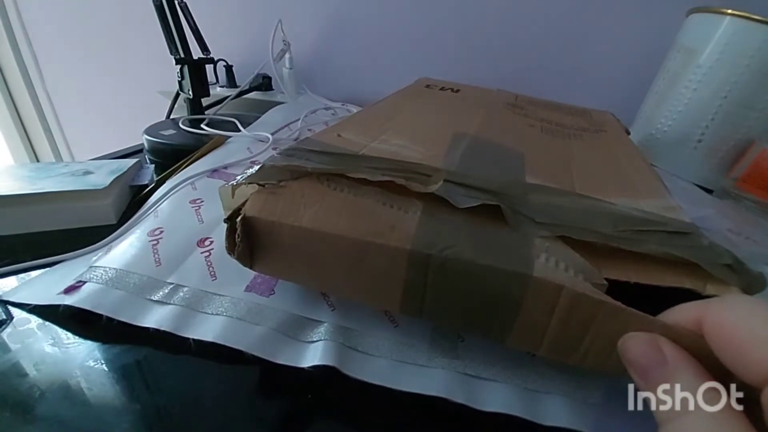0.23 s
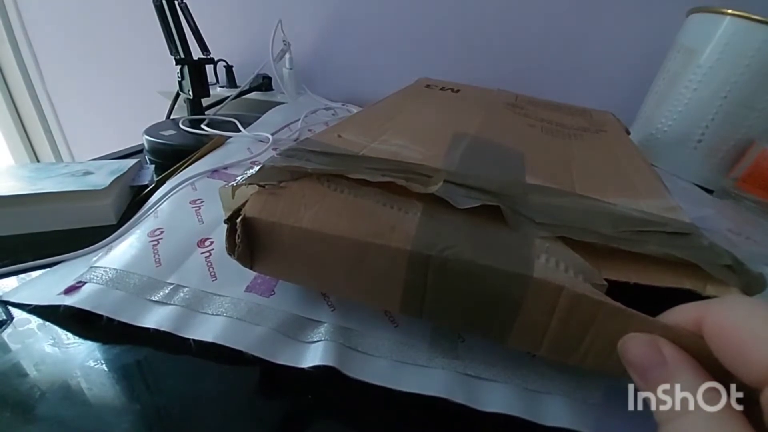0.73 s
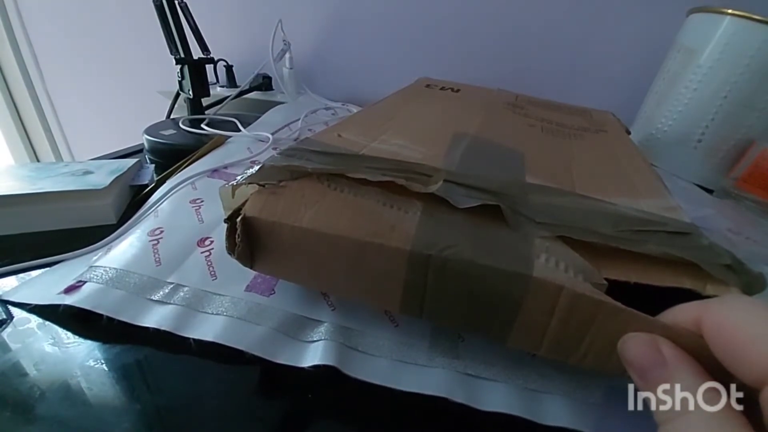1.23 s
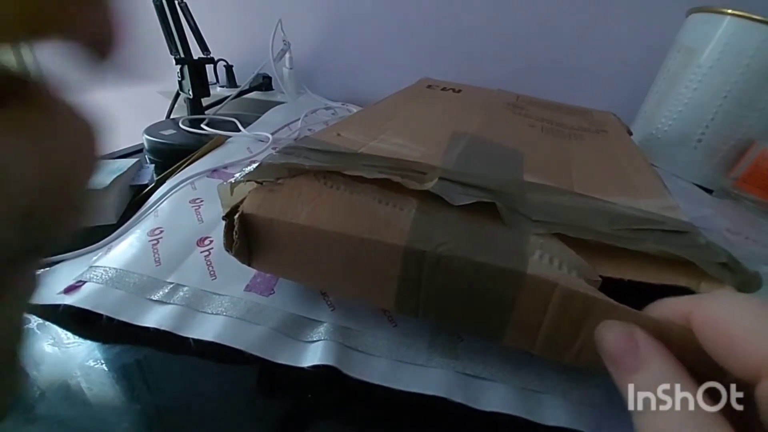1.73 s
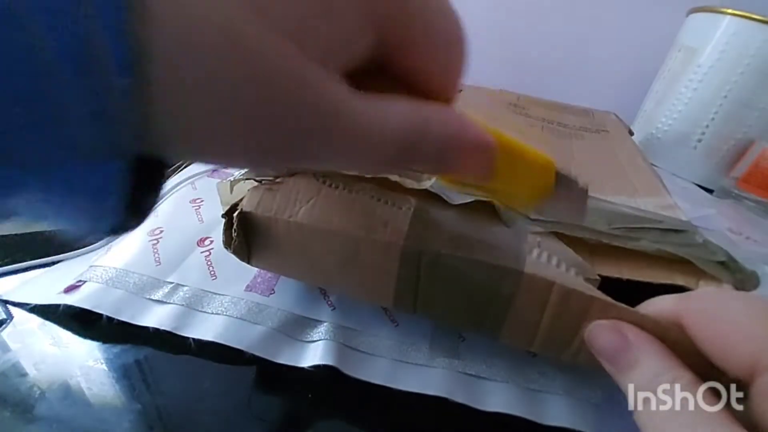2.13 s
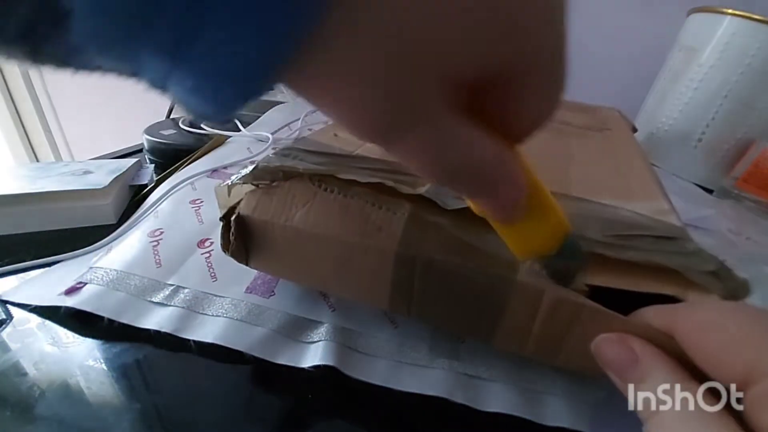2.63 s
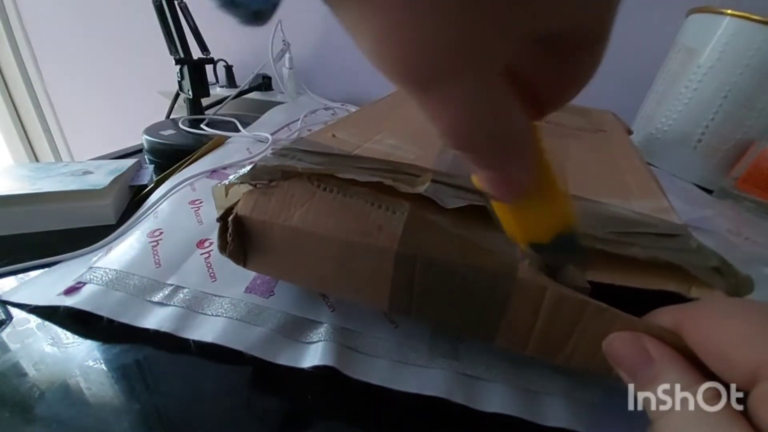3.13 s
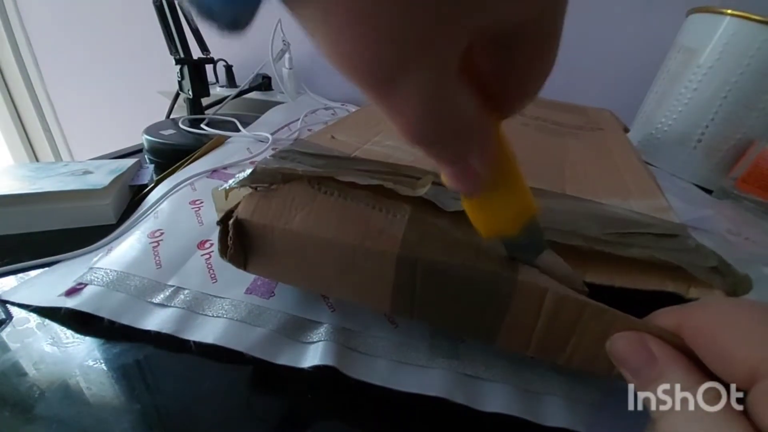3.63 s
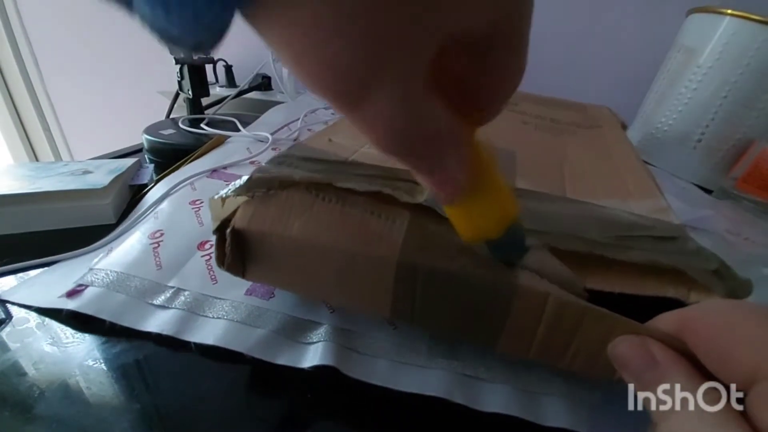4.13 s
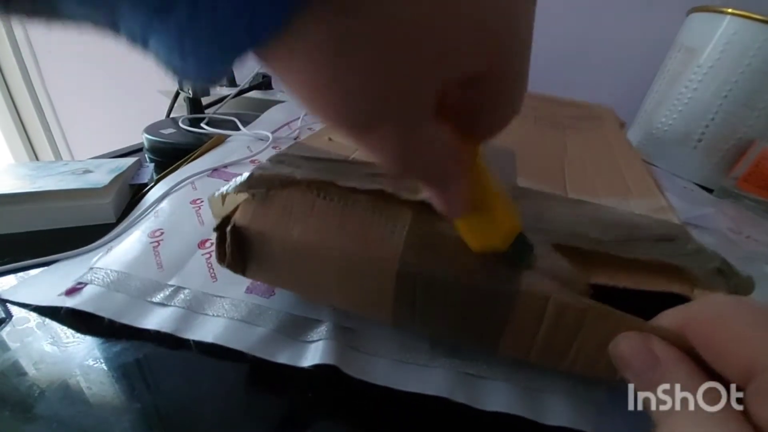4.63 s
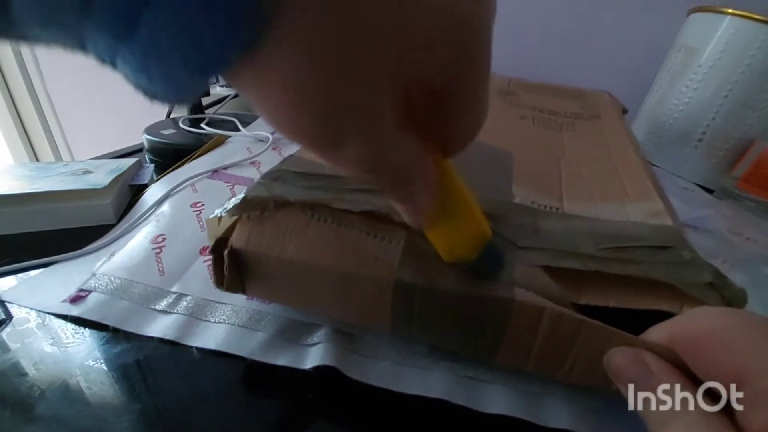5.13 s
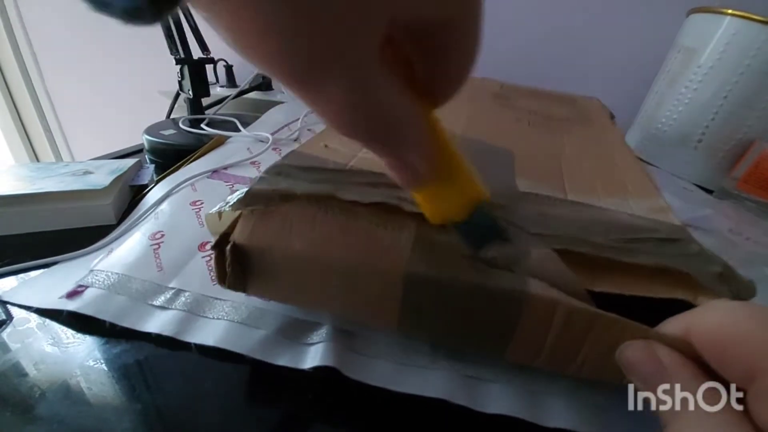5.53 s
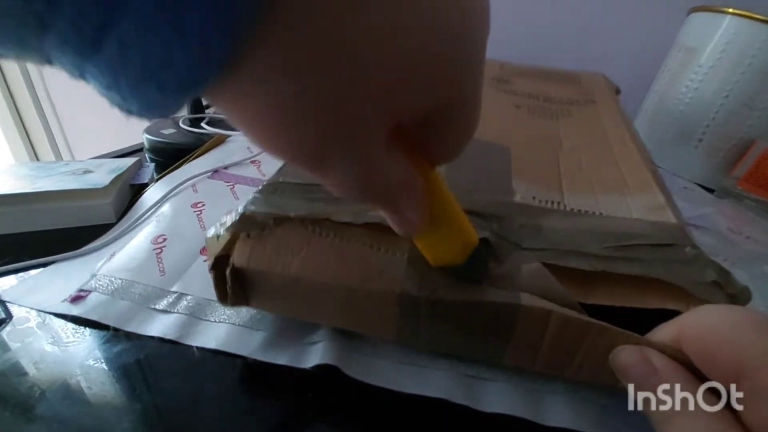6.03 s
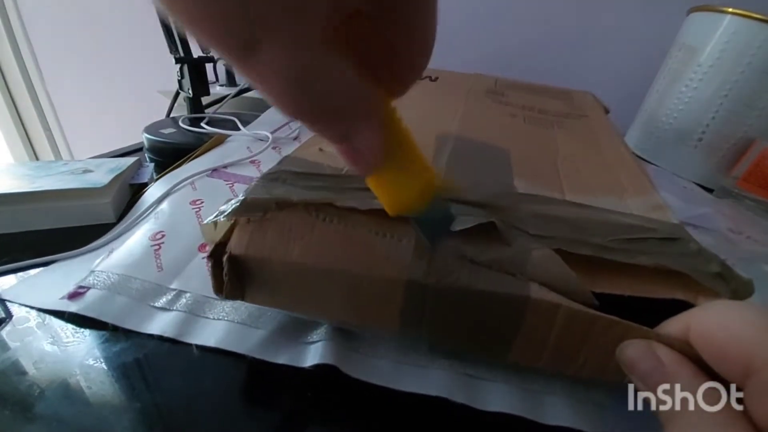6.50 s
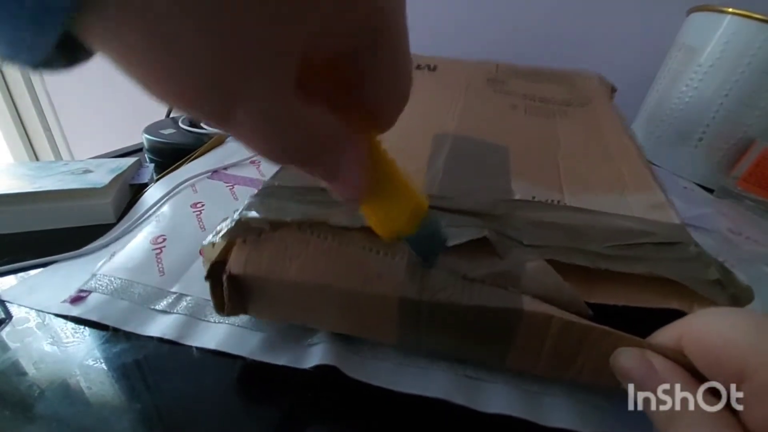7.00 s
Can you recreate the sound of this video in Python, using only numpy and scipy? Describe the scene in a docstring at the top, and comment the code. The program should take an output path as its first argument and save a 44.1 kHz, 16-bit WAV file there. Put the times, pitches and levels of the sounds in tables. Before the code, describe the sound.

A box cutter's slider clicks and rattles lightly on the left, and a sleeve brushes past. The blade then scrapes at a taped cardboard parcel, breaks through with a loud crack and a hollow thump, and saws on in short, irregular strokes. Tape snaps and ticks while the cardboard rasps and tears. It is all heard from close by in a small, quiet room.

```python
"""Box cutter opening a parcel

A box cutter's slider clicks out on the left, a sleeve swings in, and the blade saws through a taped
parcel on a desk. Fibres fracture in short strokes and force the cut flap and the hollow box into
vibration; tape snaps where the blade catches. A phone stands close by in a small, quiet room."""
import sys
import numpy as np
from scipy import signal
from scipy.fft import rfft, irfft
from scipy.io import wavfile
from scipy.ndimage import uniform_filter1d

SR = 44100
rng = np.random.default_rng(int(sys.argv[2]) if len(sys.argv) > 2 else 0)


def transcribe(signal):
    """Save signal, clipped to [-1, 1], as a 16-bit WAV file at the path in sys.argv[1]."""
    frames = np.atleast_2d(signal).T
    limited = np.clip(frames, -1, 1)
    pcm = np.round(limited * 32767).astype(np.int16)
    wavfile.write(sys.argv[1], SR, pcm)


N = 320166
T = np.arange(N) / SR
CONTACT_S, PIERCE_S = 2.33, 3.2  # the blade touches the parcel, then breaks through


def cutting():
    """Forced vibration: one train of fibre breaks and edge friction drives the cut, flap and box."""
    fibre_gain, flap_gain, box_gain, grit = pushes()
    breaks = crackle(rate=1600, scatter_db=8.5, even_s=0.035)
    drive = np.sqrt(grit) * breaks + np.sqrt(1 - grit) * rng.standard_normal(N)
    cut, cracks = fracture(drive * fibre_gain, grit)
    rasp = flap_rasp(drive * flap_gain)
    boom = box_boom(drive * box_gain)
    # long waves reach both microphones alike, short ones are scattered by the creased tape
    return (spread(cut, near_db=3, near_ms=1.0, room_db=-19, pan_db=1.8)
            + spread(cracks, near_db=6.5, near_ms=1.0, room_db=-18.5, pan_db=2.3)
            + spread(rasp, near_db=1.5, near_ms=2.8, room_db=-16, pan_db=3.0)
            + spread(boom, near_db=-2.5, near_ms=3.5, room_db=-11.5, pan_db=1.5))


# Pushes of the blade. Each row: peak time in seconds, rise and fall in ms, levels of fibres, flap and
# box in dB, grit from 0 (gliding in tape) to about 1 (tearing through board).
BLADE_STROKES = [(2.384, 42, 31, -36, -31, -37.5, 0.55), (2.492, 39, 132, -48, -40, -34, 0.55),
                 (2.661, 104, 150, -40, -41, -35.5, 0.5), (2.843, 57, 35, -47.5, -49, -41.5, 0.6),
                 (2.973, 56, 190, -42.5, -46, -48, .25), (3.146, 34, 65, -41, -39, -30, 0.71),
                 (3.226, 21.4, 68, -18, -23.5, -18.5, 0.87), (3.502, 130, 100, -45.5, -42, -43.5, 0.32),
                 (3.685, 31.3, 19, -24, -28.5, -30, 0.62), (3.746, 75, 51, -40, -40, -38, .8),
                 (3.967, 49.5, 71, -33.5, -28.5, -36.5, 0.83), (4.201, 104, 124, -42.5, -43, -43.5, .78),
                 (4.475, 19, 36, -57, -66, -48, 0.71), (4.605, 29, 35, -43, -58, -65, 0.59),
                 (4.699, 95, 108, -39.5, -37.5, -45, 0.32), (4.864, 112, 120, -41.5, -41.5, -57, 0.91),
                 (4.99, 99, 95, -42, -50, -49, 0.86), (5.085, 75, 36, -30.5, -30.5, -35, 0.7),
                 (5.159, 160, 95, -35.5, -37, -38, 0.69), (5.39, 20, 97, -43.5, -47, -54.5, 1),
                 (5.458, 82, 380, -43.5, -38.5, -47, 0.86), (5.565, 67, 55, -59, -57, -43, 1.1),
                 (5.712, 48, 33, -37.5, -44, -49, 1.08), (5.8, 58, 39, -41, -38, -42, 0.3),
                 (5.877, 47, 42, -25.5, -27.5, -26, 0.66), (5.933, 34, 48, -31.5, -36, -35.5, 0.95),
                 (6.133, 90, 120, -44.5, -42.5, -44.5, 0.41), (6.422, 81, 62, -44, -40.5, -38.5, 1.07),
                 (6.533, 40, 31, -52, -44.5, -37.5, 0.49), (6.761, 94, 70, -53, -56, -65, 0.92),
                 (6.961, 110, 89, -47.5, -55.5, -66, 0.83), (7.039, 59, 60, -43, -46, -60, 0.68),
                 (7.1, 58, 79, -49, -53, -48, 0.69), (7.161, 30, 120, -36.5, -41, -40, 0.38),
                 (7.25, 72, 94, -31, -36, -38, 0.77)]


def pushes():
    """Incoherent sources add in power: gains of fibres, flap and box, and the power-weighted grit."""
    fibre, flap, box, grit = np.zeros((4, N))
    for s, rise, fall, fibre_db, flap_db, box_db, rough in BLADE_STROKES:
        force = swell(s, rise, fall)
        power = (undb(fibre_db) * force) ** 2
        fibre += power
        grit += rough * power
        flap += (undb(flap_db) * force) ** 2
        box += (undb(box_db) * swell(s, rise, fall * 0.94)) ** 2  # the box fades a little sooner
    return np.sqrt(fibre), np.sqrt(flap), np.sqrt(box), np.clip(grit / (fibre + 1e-30), 0, 1)


# Spectrum of a breaking fibre. Each row: frequency in Hz, level in dB.
FIBRE_SPECTRUM = [(700, -14.5), (2000, -4), (3000, -2), (3900, 0.5), (4900, 1), (5600, -1.5), (6300, -1),
                  (7200, 1.5), (8500, -1.5), (10500, 1), (12500, 1.5), (14000, 1), (16000, -6.5)]
# Resonance of the steel blade. Each row: frequency in Hz, bandwidth in Hz, level in dB.
BLADE_MODES = [(7900, 750, 0)]


def fracture(drive, grit):
    """Fracture radiates broadband noise, while friction in tape excites the blade's resonance."""
    fibre = colour(FIBRE_SPECTRUM)
    edge = facets(drive)
    tearing = through(surface_scrape(edge, 8700, "low"), fibre)
    singing = undb(-14) * through(edge * (1 - grit), ring(BLADE_MODES))
    cracks = snaps(fibre) + tape_ticks(fibre)
    return tearing + singing, cracks


# Resonances of the cut flap. Each row: frequency in Hz, bandwidth in Hz, level in dB.
FLAP_MODES = [(590, 180, -9.5), (759, 100, -3), (924, 300, 0), (1085, 126, -2), (1210, 220, -2),
              (1580, 280, -4), (1727, 217, -1.5), (2206, 4200, -3.5)]


def flap_rasp(drive, limp_span_s=(4.95, 6.44), limp_hz=910):
    """Plate vibration: the flap rasps at its modes and turns duller as the longer cut leaves it limp."""
    flap = ring(FLAP_MODES)
    stiff = through(drive, flap) + snaps(flap, thump=True)
    dull = signal.sosfilt(signal.butter(1, limp_hz, fs=SR, output="sos"), stiff)
    freed = np.interp(T, limp_span_s, [0, 1])
    return (1 - freed) * stiff + freed * undb(4.5) * dull


# Resonances of the hollow box. Each row: frequency in Hz, bandwidth in Hz, level in dB.
BOX_MODES = [(67.5, 28, -13), (118, 38, -8), (243, 39.4, 0), (298.3, 55.5, 2.5), (347.3, 40, -2),
             (421.7, 39, -3.5), (517, 160, -12)]


def box_boom(drive):
    """Resonance of a hollow body: the box booms at its low modes under the cut and the snaps."""
    box = ring(BOX_MODES)
    return through(surface_scrape(drive, 230, "high"), box) + undb(-5) * snaps(box, thump=True)


# Tape and board giving way. Each row: start in seconds, decay in ms, crack in dB, thump in dB.
TAPE_SNAPS = [(2.111, 1.15, -44, -32.5), (2.352, 0.6, -31, -39), (2.565, .19, -36, -69),
              (3.216, 3.9, -16, -14), (3.233, 3.3, -22, -17), (3.422, 0.33, -38.5, -45.5),
              (3.456, 0.28, -37.5, -40.5), (3.656, 0.22, -35, -42.5), (3.744, 2.5, -53, -27.5),
              (3.886, 0.49, -44, -52), (3.911, .44, -41.5, -42), (4.087, 2.6, -38, -48),
              (4.146, 2.3, -43, -37), (4.193, 0.92, -38, -58), (4.302, 0.16, -39, -46),
              (4.581, .27, -41.5, -72), (4.631, 1.3, -34.5, -51), (4.857, 3, -34, -31),
              (4.922, 2.8, -30.5, -52), (5.087, 3, -27, -25.5), (5.271, .3, -52, -85),
              (5.309, 0.37, -45, -65), (5.371, 0.18, -41.5, -60), (5.411, .23, -40, -49),
              (5.443, 2.6, -32.5, -32), (5.52, 0.15, -28.5, -32.5), (5.55, 2.2, -24.5, -22.5),
              (5.587, 1.5, -34, -59), (5.768, 0.082, -33, -46), (5.933, 0.21, -25.5, -47),
              (6.108, 0.6, -33.5, -39), (6.189, 2.9, -38, -45), (6.346, 0.31, -39.5, -41.5),
              (6.396, 3.8, -36, -31), (6.471, 0.68, -39, -36.5), (6.516, 3.8, -35.5, -35),
              (6.584, 0.33, -51, -58), (7.032, 0.37, -41, -51)]


def snaps(response, thump=False):
    """Sudden release of strain excites a response, as a crack at the cut or a thump in a body."""
    s, ms, crack_db, thump_db = np.transpose(TAPE_SNAPS)
    return blows(s, ms, thump_db if thump else crack_db, response)


def tape_ticks(response, count=256, per_s=57, decay_ms=0.26):
    """A Poisson process: the strained tape ticks at random while the blade rests in it."""
    s = CONTACT_S + np.cumsum(rng.exponential(1 / per_s, count))
    db = -64 + 2.5 * rng.standard_normal(count)
    return blows(np.minimum(s, N / SR), np.full(count, decay_ms), db, response)


def facets(x, shared=0.51):
    """Directivity: each break faces its own way, so the microphones share only part of its power."""
    return x * (np.sqrt(shared) + np.sqrt(1 - shared) * rng.choice([-1, 1], (2, N)))


def surface_scrape(x, hz, kind):
    """Shallow contact hardly excites one end of the spectrum until the blade breaks through."""
    weak = signal.sosfilt(signal.butter(1, hz, kind, fs=SR, output="sos"), x)
    return np.where(T < PIERCE_S, weak, x)


# The detent lifts out of a notch and drops into the next. Each row: drop time in seconds, lead of
# the lift in ms, lift relative to the drop in dB, shell level in dB, blade level in dB.
DETENT_NOTCHES = [(0.067, 12, -15.5, -27, -18.5), (0.126, 12.3, 4.5, -33, -27),
                  (0.321, 11, -14.5, -32, -20), (0.504, 11.8, -2, -37.5, -36.5), (0.996, 6, -7.5, -37, -32),
                  (1.017, 14, -9.5, -26, -28), (1.663, 14, -6.5, -26, -27.5), (1.682, 6.4, -20, -18.5, -40)]
# The loose slider ticks in the handle. Each row: start in seconds, shell level in dB, blade level in dB.
SLIDER_TICKS = [(0.006, -49.5, -35), (0.451, -46, -53), (0.793, -50, -54), (0.821, -46, -58),
                (0.892, -42, -48.5), (1.153, -45.5, -45), (1.245, -50.5, -52.5), (1.291, -46, -61),
                (1.444, -44.5, -58.5), (1.596, -38, -49), (1.736, -37, -67), (1.797, -35.5, -50),
                (2.228, -56, -47)]
# Resonances of the plastic shell. Each row: frequency in Hz, bandwidth in Hz, level in dB.
SHELL_MODES = [(1712, 600, -9), (1988, 260, -1), (2278, 170, -0.5), (2463, 305, -1.5), (3380, 480, -11.5),
               (4110, 490, -12), (5780, 810, -12)]
# Spectrum of the chattering steel blade. Each row: frequency in Hz, level in dB.
BLADE_SPECTRUM = [(60, -15), (250, -18), (900, -21), (2500, -6.5), (4700, -5), (6000, -2), (7800, -7),
                  (9800, -0.5), (12000, -3.5), (16000, -4)]


def slider(creep_count=7):
    """Impact excitation: the detent jumps its notches, so the shell knocks and the blade chatters."""
    drops = [(s, shell, blade) for s, _, _, shell, blade in DETENT_NOTCHES]
    lifts = [(s - ms / 1000, shell + db, blade + db) for s, ms, db, shell, blade in DETENT_NOTCHES]
    creep = [(s, -54, -64) for s in rng.uniform(0.55, 0.75, creep_count)]  # ticks between two notches
    jumps, ticks = drops + lifts, SLIDER_TICKS + creep
    s, shell_db, blade_db = np.transpose(jumps + ticks)
    knock_ms, chatter_ms = np.full(len(s), 1.5), [3.2] * len(jumps) + [3.7] * len(ticks)
    shell = blows(s, knock_ms, shell_db, ring(SHELL_MODES))
    # a faint, smooth high hiss swells and fades behind the clicks
    hiss = undb(-62) * swell(1.58, rise_ms=704, fall_ms=554.5) * rng.standard_normal(N)
    bright = colour(BLADE_SPECTRUM)
    treble = blows(s, chatter_ms, blade_db, bright) + through(hiss, bright)
    left, right = (spread(shell, near_db=0, near_ms=4.5, room_db=-12, pan_db=10)
                   + spread(treble, near_db=8, near_ms=2.3, room_db=-9, pan_db=7.5))
    return np.array([left, np.pad(right, (22, 0))[:N]])  # the far side hears it 0.5 ms later


# Sweeps of the arm. Each row: peak time in seconds, rise in ms, fall in ms, level in dB.
SLEEVE_SWEEPS = [(1.451, 220, 350, -70.5), (1.85, 196, 123, -43.5), (2.058, 96, 230, -53.5)]
# Spectrum of rubbing cloth. Each row: frequency in Hz, level in dB.
CLOTH_SPECTRUM = [(60, -22.5), (500, -12.5), (950, 2.5), (1400, -1.5), (3000, -9), (5500, -12), (8000, -14),
                  (16000, -16.5)]


def sleeve():
    """Friction noise: cloth brushes along, louder the faster the arm comes round."""
    speed = sum(undb(db) * swell(s, rise, fall) for s, rise, fall, db in SLEEVE_SWEEPS)
    rub = through(crackle(rate=5000, scatter_db=10.5, even_s=0.044) * speed, colour(CLOTH_SPECTRUM))
    return spread(rub, near_db=2.5, near_ms=10, room_db=-15, pan_db=3)


# Low thumps of handling. Each row: start in seconds, decay in ms, level in dB.
HANDLING_THUMPS = [(0.07, 60, -52), (0.321, 19, -47.5), (3.224, 35, -34), (5.869, 27, -37),
                   (6.53, 25, -47.5), (7.121, 50, -33), (7.199, 29, -36)]


def handling():
    """Damped resonance: handling thumps at two low modes under the first slider clicks and hard cuts."""
    s, ms, level_db = np.transpose(HANDLING_THUMPS)
    boom = blows(s, ms, level_db, ring([(55, 18, -3.5), (92, 52, -3.0)]))
    return spread(boom, near_db=-16, near_ms=5, room_db=-19, pan_db=7)


# Spectrum of the quiet room. Each row: frequency in Hz, level in dB.
ROOM_SPECTRUM = [(25, -2), (60, 8), (160, -4), (280, 1), (500, -12), (1000, -23.5), (4000, -11.5),
                 (16000, -20.5)]


def hush():
    """Stationary noise: the low murmur of the room with a faint hiss above it."""
    air = through(rng.standard_normal(N), colour(ROOM_SPECTRUM, size=4096))
    return undb(-70.5) * spread(air, near_db=-2.5, near_ms=4, room_db=-4.5, pan_db=0)


def spread(x, near_db, near_ms, room_db, pan_db, size=4096, tail_size=16384, t60_s=0.22):
    """Superposition of direct sound, near scatter that changes as the hands move, and reverberation."""
    hop = size // 2
    window = np.sin(np.pi * np.arange(size) / size)
    stereo = np.pad(np.broadcast_to(x, (2, N)), ((0, 0), (hop, size)))
    frames = np.lib.stride_tricks.sliding_window_view(stereo, size, axis=-1)[:, ::hop] * window
    t = T[:size // 4]
    # each frame at each microphone has its own near reflections
    near = unit(rng.standard_normal((2, frames.shape[1], len(t))) * np.exp(-1000 * t / near_ms))
    pieces = signal.fftconvolve(frames, near, axes=-1)
    scatter = np.zeros((2, N + 3 * size))
    for k in range(frames.shape[1]):
        scatter[:, k * hop:k * hop + pieces.shape[-1]] += pieces[:, k]
    t = T[:tail_size]
    build_up = np.minimum(t / 0.0095, 1) ** 2
    walls = unit(rng.standard_normal((2, tail_size)) * undb(-60 * t / t60_s) * build_up)
    close = (x + undb(near_db) * scatter[:, hop:hop + N]) / np.hypot(1, undb(near_db))
    balance = undb(np.array([[pan_db], [-pan_db]]) / 2)
    return (close + undb(room_db) * through(x, walls)) * balance


def blows(times, decays_ms, levels_db, response, size=4096):
    """Transient excitation: bursts of tiny slips strike a body; a level is their energy as a 10 ms rms."""
    out, t = np.zeros(N + size), T[:size]
    slips = rng.standard_normal((len(times), size))
    for s, ms, db, slip in zip(times, decays_ms, levels_db, slips):
        burst = slip * np.exp(-1000 * t / max(ms, .1))
        start = max(int(s * SR), 0)
        out[start:start + size] += undb(db) * np.sqrt(SR / 100) * unit(through(burst, response)[0])
    return out[:N]


def crackle(rate, scatter_db, even_s):
    """Shot noise: `rate` random impulses a second, of log-normal force, levelled to a steady power."""
    hits = rng.random(N) < rate / SR
    impulses = hits * undb(scatter_db * rng.standard_normal(N)) * rng.choice([-1, 1], N)
    power = uniform_filter1d(impulses ** 2, int(even_s * SR))
    return impulses / np.sqrt(np.maximum(power, 1e-6))


def swell(s, rise_ms, fall_ms):
    """Amplitude envelope: a rounded peak, 20 dB down one rise before it or one fall after it."""
    ms = 1000 * (T - s)
    away = np.maximum(-ms / rise_ms, ms / fall_ms)
    gain, near = np.zeros(N), away < 10
    gain[near] = undb(-20 * away[near] ** 1.36)
    return gain


def ring(modes, size=4096):
    """Modal superposition: a body's impulse response is a sum of damped sines, alternating in sign."""
    t = T[:size]
    return unit(sum((-1) ** k * undb(db) * unit(np.exp(-np.pi * width * t) * np.sin(2 * np.pi * hz * t))
                    for k, (hz, width, db) in enumerate(modes)))


def colour(points, size=1024):
    """Minimum phase: folding the cepstrum gives a causal response with the given spectrum."""
    hz, db = np.transpose(points)
    bins = np.maximum(np.fft.rfftfreq(size, 1 / SR), 1)
    magnitude = undb(np.interp(np.log(bins), np.log(hz), db))
    cepstrum = irfft(np.log(magnitude))
    cepstrum[1:size // 2] *= 2
    cepstrum[size // 2 + 1:] = 0
    return unit(irfft(np.exp(rfft(cepstrum))))


def through(x, response):
    """Convolution with a mono or stereo impulse response."""
    return signal.fftconvolve(np.atleast_2d(x), np.atleast_2d(response), axes=-1)[:, :np.shape(x)[-1]]


def undb(db):
    """Decibels to amplitude ratio."""
    return 10 ** (np.asarray(db) / 20)


def unit(x):
    """Normalisation to an energy of one."""
    return x / np.sqrt(np.sum(x ** 2, axis=-1, keepdims=True))


def scene():
    """Linear superposition: the pressures of all sources add."""
    return slider() + sleeve() + cutting() + handling() + hush()


def record(dry, top_hz=16000):
    """Saturation and band limiting: the phone clips at full scale and cuts the highest treble."""
    return signal.sosfilt(signal.ellip(8, .2, 70, top_hz, fs=SR, output="sos"), np.clip(dry, -1, 1))


dry = scene()
out = record(dry)
transcribe(out)
```